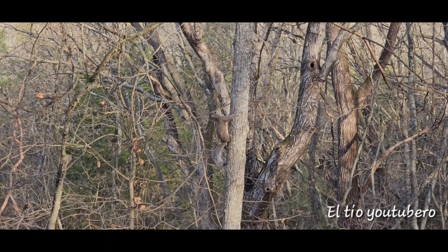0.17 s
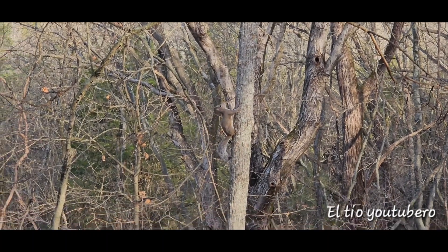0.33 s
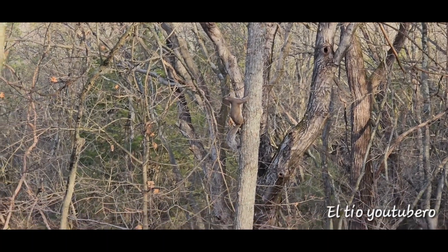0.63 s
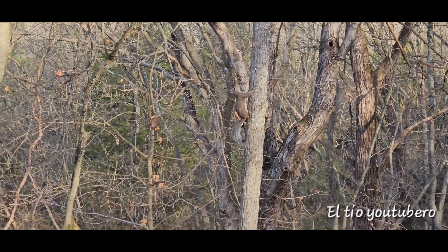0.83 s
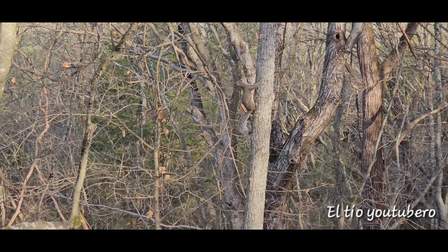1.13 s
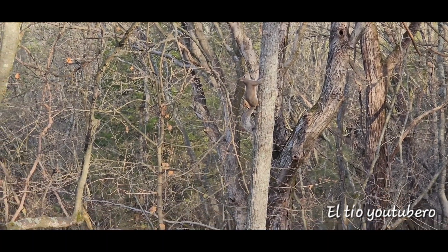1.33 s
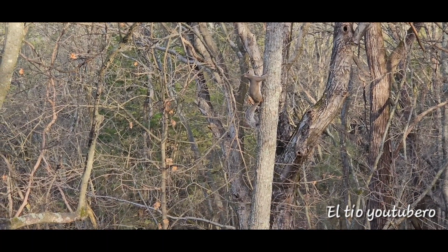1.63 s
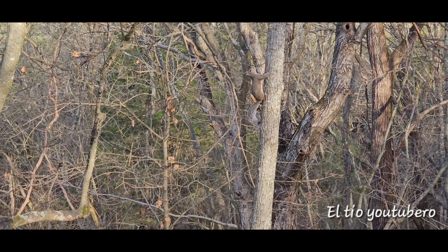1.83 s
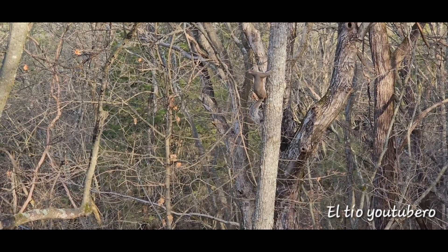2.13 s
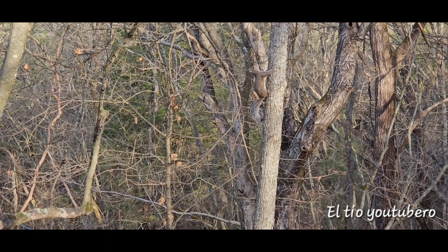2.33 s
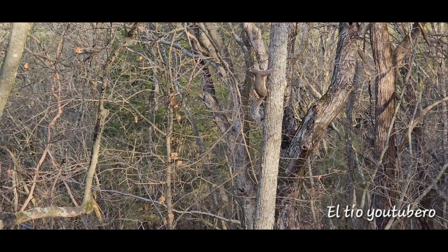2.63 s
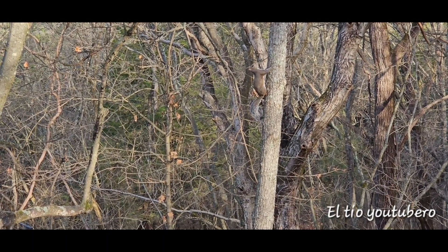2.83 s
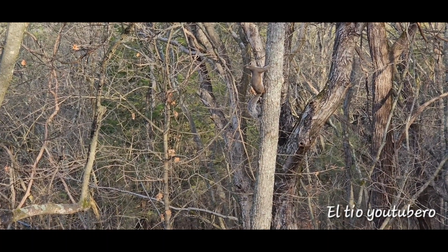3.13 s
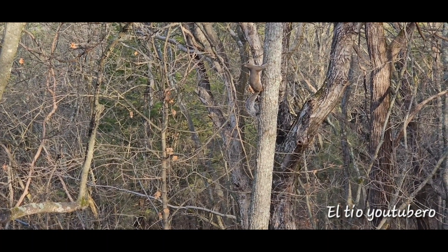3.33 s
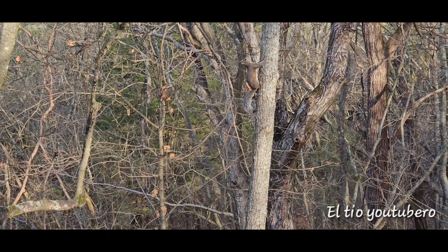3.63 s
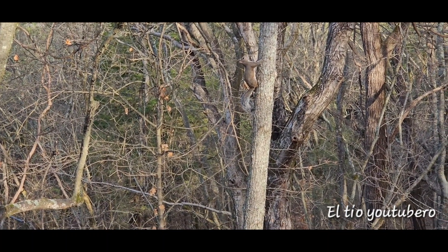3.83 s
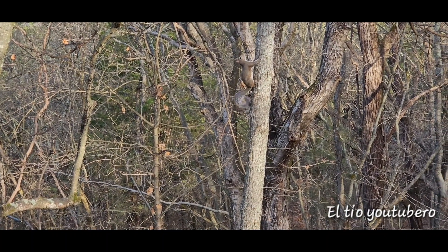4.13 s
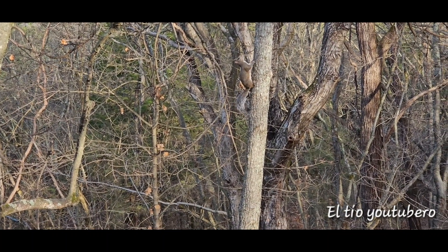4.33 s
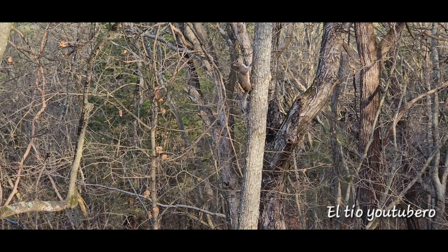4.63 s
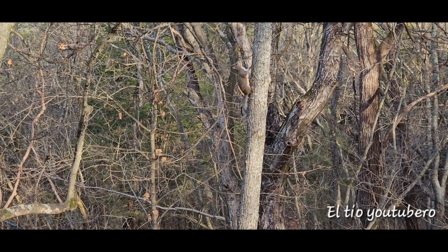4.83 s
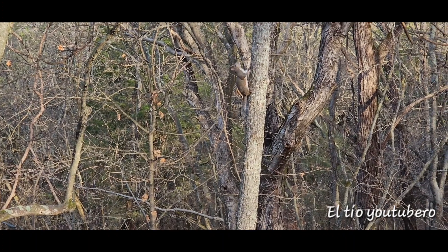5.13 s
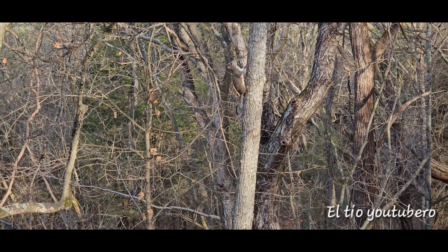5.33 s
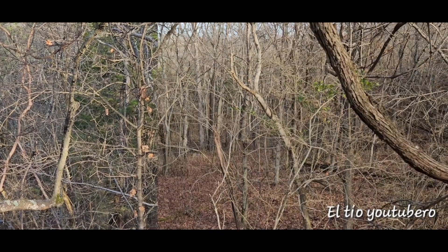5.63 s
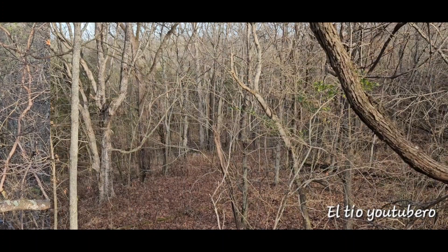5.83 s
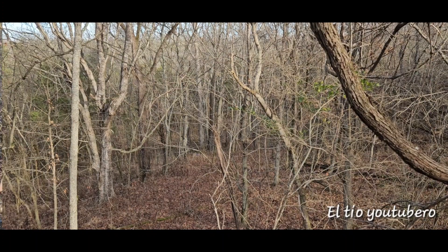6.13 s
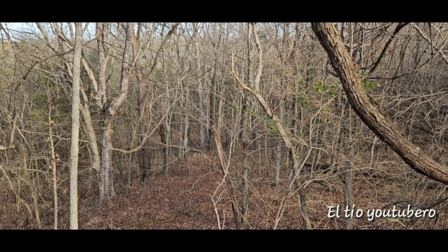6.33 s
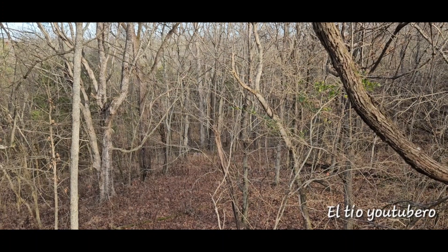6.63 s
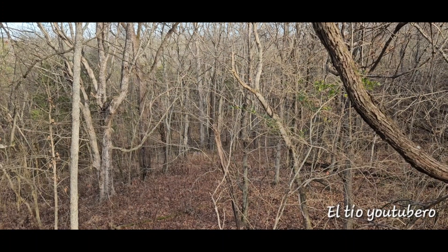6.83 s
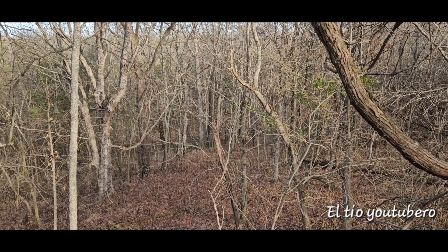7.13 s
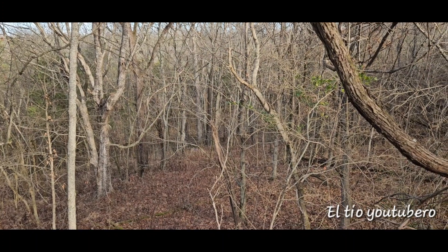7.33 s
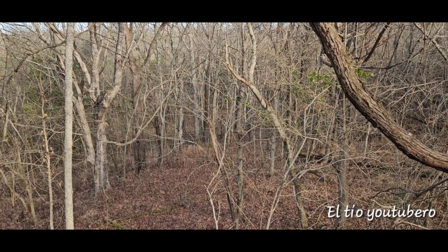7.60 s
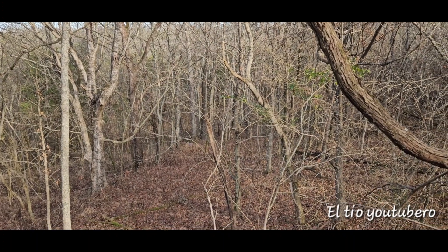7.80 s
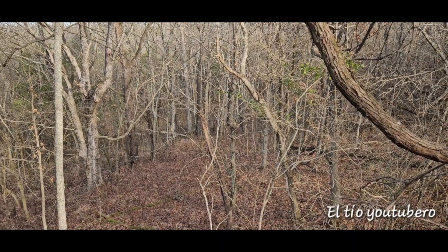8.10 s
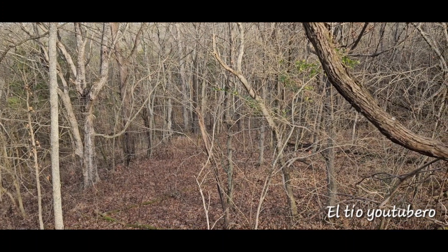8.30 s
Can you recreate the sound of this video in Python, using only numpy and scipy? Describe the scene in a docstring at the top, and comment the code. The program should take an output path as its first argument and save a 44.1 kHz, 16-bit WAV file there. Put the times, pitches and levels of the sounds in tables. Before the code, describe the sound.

Distant traffic rumbles and drones behind dry leaf crackles and thin bird calls, then cuts abruptly to quieter woods with a ringing, whistled birdsong.

```python
"""A wren-like song of gliding whistles echoes among bare winter trunks, the second of two spots heard in turn.
There, far rumble and air lie under it; a twig of ringing modes ticks and a far bird twitters.
The first spot, before a short break ending in a click, has distant traffic of noise and narrow drones,
hoarse scolds of noise and dry leaves stirred in resonant snaps. Small birds and a far whistler call
at both spots, as gliding near-sines; single leaf crunches, short noise bursts, also go on into the second."""
import sys
import numpy as np
from scipy import signal
from scipy.fft import rfft, irfft
from scipy.io import wavfile

SR = 44100
rng = np.random.default_rng(int(sys.argv[2]) if len(sys.argv) > 2 else 0)


def inscribe(sig):
    """Save sig as 16-bit PCM at rate SR to the path in sys.argv[1].

    A 1-D sig is mono; a 2-D sig holds one channel per row.
    Samples are clipped to [-1, 1] before scaling.
    """
    pcm = np.round(np.clip(np.atleast_2d(sig).T, -1, 1) * 32767)
    wavfile.write(sys.argv[1], SR, pcm.astype(np.int16))


N = 373086
TIME_S = np.arange(N) / SR
FREQS_HZ = np.maximum(np.arange(N // 2 + 1) * SR / N, 1)

FIRST_END_S, SECOND_START_S = 5.773, 5.815
BREAK_DB = -36   # what is left of the first spot during the break
CLICK_DB, CLICK_DECAY_S = -55.5, 0.0012
RIGHT_LAG_MS, CUTOFF_HZ = .2, 15500

# Stereo field of diffuse sound: (frequency [Hz], left-right likeness [0..1])
LIKENESS = [(25, .82), (60, .95), (130, .97), (300, .8), (600, .6), (1200, .25), (4000, .2), (12000, .2)]
# (frequency [Hz], left minus right [dB])
BALANCE = [(60, 0.5), (110, 0.1), (200, 0), (380, -2.5), (700, -1), (1290, -6), (2380, -5), (4400, -9.5),
           (8120, 3), (15000, -0.5)]

# Still air, first spot: (frequency [Hz], relative density [dB])
AIR_SPECTRUM = [(900, 6), (1400, -0.5), (2500, 0), (4400, 2), (5800, -11), (8300, -11.5), (10000, -29),
                (12000, -7), (15000, -16.5)]
AIR_DB = -76.5
# Steady hiss on the left, first spot: (centre [Hz], width [Hz], level [dB])
LEFT_HISS = [(2500, 620, -83.5), (3680, 520, -80)]

# Rumble and air, second spot: (frequency [Hz], relative density [dB])
FAR_RUMBLE_SPECTRUM = [(12, -58.5), (20, -32), (48, -5.5), (125, -2), (153, -8), (187, -8), (251, -10),
                       (291, -16), (390, -18), (533, -28.5), (584, -32), (688, -31), (783, -36.5),
                       (1600, -55.5), (2080, -93), (3520, -120)]
FAR_AIR_SPECTRUM = [(1200, -14), (1850, -5), (2150, 1.5), (2450, 4.5), (2900, -5), (3400, -8.5),
                    (4500, -11), (6500, -16.5), (10000, -32.5), (12000, -15), (15000, -26.5)]
FAR_RUMBLE_DB, FAR_AIR_DB = -47.5, -77.5
SETTLED_S, SETTLE_FADE_S, OPENING_RUMBLE_DB, OPENING_HISS_DB = 6.0, .03, -50.5, -74.5

# Traffic rumble and tyre noise: (frequency [Hz], relative density [dB])
RUMBLE_SPECTRUM = [(12, -47.5), (20, -13.5), (43, -13), (75, -3.5), (91, -1.5), (231, -9), (347, -25),
                   (420, -30), (550, -59.5), (920, -120)]
TYRE_SPECTRUM = [(190, -18.5), (330, -4.5), (425, -8), (517, -5), (595, -10.5), (729, -9.5), (859, -19.5),
                 (1290, -32.5), (1500, -43.5), (1950, -52.5), (3300, -120)]
# Slow swells of rumble and of tyre noise: (time [s], level [dB])
RUMBLE_FLOW = [(0, -39), (1.5, -38.5), (3.0, -39), (4.0, -37.5), (5.75, -39.5)]
TYRE_FLOW = [(0, -58), (1.2, -59), (2.3, -56.5), (3.3, -58.5), (4.3, -58), (5.75, -59)]
# Engine drone: (frequency [Hz], width [Hz], relative level [dB])
DRONE_LINES = [(87.2, 3.5, -2), (174.6, 5, -8.5), (229, 5.9, -18), (521, 8.4, -31.5), (725, 5.2, -37)]
# Load of the far engines: (time [s], drone gain [dB])
ENGINE_LOAD = [(0, -45), (1.2, -50), (2.9, -44), (4.0, -39.5), (4.7, -41), (5.7, -39.5)]

# Close rub: (frequency [Hz], relative density [dB])
BRUSH_SPECTRUM = [(5000, 4), (7000, -1.5), (9500, -26.5), (12000, 8.5), (15000, -8.5)]
# (time [s], hold [s], relative level [dB])
RUBS = [(.1, 0.25, -84.5), (.36, 0.23, -80), (.62, 0.027, -75.5), (1.0, .1, -82.5)]
RUB_ATTACK_S, RUB_RELEASE_S = .03, .1

# Dry leaves: (frequency [Hz], relative density [dB])
LEAF_SPECTRUM = [(800, -7), (1400, 0), (2200, 6.5), (3300, 2), (4500, 1), (5600, -5), (7000, -21.5),
                 (8800, -24), (10000, -37), (12000, -19), (15000, -24.5)]
# Bouts of stirring: (time [s], hold [s], relative level [dB])
STIRS = [(0.0, 0.44, -66), (.43, 0.19, -64.5), (.7, 0.37, -70.5), (1.02, 0.38, -69.5), (1.5, 0.16, -72.5),
         (1.78, 0.028, -74), (2.08, 0.044, -68.5), (2.26, .11, -76), (2.66, 0.51, -80.5),
         (3.68, 0.045, -68.5), (3.87, 0.11, -74.5), (4.36, 0.69, -76.5), (4.94, 0.32, -69.5),
         (5.33, .02, -75.5), (5.73, 0.044, -68)]
STIR_ATTACK_S, STIR_RELEASE_S, STIR_REST_DB = 0.017, .07, -82.5   # rest level relative, as in STIRS
# Single crunches: (time [s], relative level [dB], decay constant [s], resonance [Hz])
CRUNCHES = [(0.071, -55, 0.0046, 4000), (0.166, -56.5, 0.0078, 2400), (.197, -63.5, .008, 2200),
            (0.265, -59.5, 0.008, 3600), (0.312, -63, 0.0055, 2300), (.44, -64.5, 0.065, 2400),
            (0.574, -63.5, 0.0069, 2400), (1.052, -65, 0.01, 2600), (1.181, -62.5, 0.0067, 2600),
            (1.388, -63, .003, 5000), (1.429, -63.5, 0.011, 2400), (1.472, -62, 0.0044, 3190),
            (1.505, -65.5, 0.0085, 2500), (1.732, -65.5, .008, 3300), (1.791, -63, 0.0072, 2800),
            (2.062, -64.5, 0.005, 3990), (3.057, -64.5, 0.0074, 2400), (3.692, -66.5, .008, 2100),
            (3.718, -63, 0.009, 2100), (3.898, -58, 0.0055, 1800), (3.973, -65, 0.0062, 3490),
            (4.615, -67.5, .01, 3200), (4.96, -65, .005, 2800), (4.981, -63, 0.006, 2600),
            (5.12, -65, .008, 2300), (5.149, -61.5, .005, 2000), (5.174, -61.5, 0.006, 2300),
            (5.205, -63.5, .004, 2100), (5.237, -59, 0.006, 2300), (5.262, -64.5, .007, 2700),
            (5.348, -65, 0.0074, 2600), (5.527, -52.5, 0.003, 1600), (5.91, -67, .012, 1900),
            (7.026, -62, .004, 3490), (8.35, -72, 0.056, 2100)]
CRUNCH_RING = 2.2   # strength of each crunch's own resonance
CLUMPS_PER_S, CLUMP_DB = 60, 1.7   # snaps come in uneven clumps
# the leaf sound grows duller: treble gain at first and its loss
LEAF_TREBLE_HZ, LEAF_TREBLE_DB, LEAF_DULLING_DB_PER_S = 4700, 1, 2

# Twig snaps: (time [s], relative level [dB])
TICKS = [(6.4416, -38), (7.921, -59)]
# Twig modes: (frequency [Hz], relative level [dB], T60 [s])
TWIG_MODES = [(2650, -8, .005), (3300, -5.5, .005), (6500, -3.5, .0045), (7400, -1.5, .0045),
              (8900, -18, .008), (11900, -12, 0.0078)]
TWIG_LOW_HZ = 2000   # the snap is cut off below this

# Harsh scolding notes: (time [s], length [s], centre [Hz], relative level [dB])
SCOLDS = [(2.091, 0.044, 4210, -61.5), (2.152, 0.017, 3780, -64.5), (2.327, 0.06, 3780, -73),
          (4.35, 0.056, 3930, -63.5), (5.759, 0.036, 4200, -68)]
# Run of falling chips: (time [s], relative level [dB])
CHIPS = [(1.205, -65), (1.245, -67), (1.272, -64), (1.293, -62.5), (1.32, -60.5), (1.355, -71)]
CHIP = (0.032, 4500, 3950, 3250)   # (length [s], start [Hz], middle [Hz], end [Hz])

# Contours: (start, middle, end) as multiples of a note's nominal pitch
WHISTLE_CONTOUR, TWITTER_CONTOUR = (1.005, 0.96, 0.97), (0.89, 0.97, 0.98)
ARCH_CONTOUR, ARCH_LEAN_DB = (.87, 1, .87), -19.5
# Far whistler: (time [s], length [s], nominal pitch [Hz], relative level [dB])
WHISTLES = [(.77, 0.28, 3215, -73.5), (2.95, .1, 3130, -76), (3.16, 0.19, 3680, -73.5),
            (3.14, .17, 2760, -75), (3.58, 0.11, 3650, -75), (3.745, 0.097, 3590, -69),
            (4.015, .12, 3724, -70.5), (4.11, .08, 3600, -73), (4.03, 0.13, 2675, -81),
            (4.47, 0.2, 3700, -68.5), (4.66, 0.083, 3560, -71.5), (4.72, 0.06, 3130, -75),
            (4.98, .13, 3590, -69.5), (5.69, 0.03, 3550, -75), (5.715, .03, 3200, -74),
            (5.817, 0.06, 3130, -64), (5.835, 0.04, 2770, -71), (5.845, 0.08, 2560, -67),
            (5.92, 0.088, 2390, -72.5), (8.335, 0.05, 2380, -74.5)]
# Trembling twitters: (time [s], length [s], nominal pitch [Hz], relative level [dB])
TWITTERS = [(7.88, .05, 6890, -82), (7.985, 0.027, 6100, -76), (8.015, 0.027, 6700, -82),
            (8.025, 0.03, 7850, -85), (8.08, 0.028, 5980, -74.5), (8.17, .035, 5780, -75.5),
            (8.225, .02, 6300, -82), (8.262, 0.042, 5800, -75.5), (8.36, .03, 5900, -79)]
# Arched chirps: (time [s], length [s], nominal pitch [Hz], relative level [dB])
ARCHES = [(.015, 0.041, 7370, -58), (.102, 0.036, 7370, -61.5), (.185, 0.029, 7320, -64),
          (.268, .028, 7240, -64), (1.533, .03, 6270, -59), (1.612, .024, 5900, -66),
          (1.773, 0.012, 6950, -72), (1.821, 0.039, 7300, -66), (1.911, .031, 6250, -61.5),
          (2.004, 0.027, 5900, -69)]
# Down-slurs from one top pitch: (time [s], length [s], middle [Hz], end [Hz], relative level [dB])
SLURS = [(1.013, 0.016, 6500, 5040, -65.5), (1.181, 0.034, 6930, 6850, -75),
         (1.334, .038, 6750, 6600, -64.5), (1.454, .037, 6830, 5100, -68), (2.669, .026, 6120, 4700, -62.5),
         (4.331, 0.032, 6900, 6200, -69)]
SLUR_TOP_HZ, SLUR_LEAN_DB = 7900, -18
# Thin, nearly level notes: (time [s], length [s], start [Hz], end [Hz], relative level [dB])
THIN_NOTES = [(.585, 0.048, 6470, 6350, -77), (.885, .019, 6000, 5880, -74), (1.51, .05, 5300, 5050, -73),
              (1.7, .04, 5050, 4850, -76), (2.556, .085, 7620, 7430, -70), (2.764, .05, 4470, 4520, -60),
              (2.83, 0.041, 4500, 4480, -70), (2.93, .04, 4490, 4460, -75),
              (3.612, 0.07, 7900, 7450, -71.5), (3.71, .05, 7400, 7220, -68.5),
              (3.799, .06, 7360, 7240, -69), (3.9, .06, 7290, 7240, -75.5), (4.345, .062, 8150, 8140, -79),
              (4.904, 0.085, 8400, 8170, -79), (5.06, .12, 8480, 8380, -81.5)]
THIN_LEAN_DB = -11.5
# Peaked calls: (time [s], relative level [dB])
PEAKED_CALLS = [(6.262, -71), (7.498, -66.5)]
# Strokes of one peaked call:
# (time into call [s], length [s], start [Hz], middle [Hz], end [Hz], relative level [dB])
PEAKED_STROKES = [(0, .066, 7320, 7870, 8480, 2), (.066, .043, 8530, 8300, 7400, -2)]

# One song phrase, pitches before the round's factor:
# (time into phrase [s], length [s], start [Hz], middle [Hz], end [Hz], relative level [dB])
PHRASE = [(-.003, .014, 5900, 4960, 4600, -8), (.01, .03, 4560, 4280, 3990, -3.5),
          (0.051, .019, 3200, 4050, 4700, -0.5), (.068, .03, 4600, 4650, 4620, -11),
          (0.105, .036, 2830, 2952, 3060, 0), (.146, .032, 2650, 2330, 2050, -4.5),
          (.228, .04, 3810, 3590, 3494, -4), (.268, .062, 3470, 3440, 3420, -0.5),
          (.328, .042, 3030, 2855, 2580, 3.5), (.37, .06, 2573, 2557, 2545, -2.5)]
# Rounds of the phrase: (time [s], relative level [dB], pitch factor [ratio])
ROUNDS = [(6.47, -59, 1), (6.937, -55.5, 1), (7.405, -55.5, 1), (7.878, -55, .995)]
SONG_END_S = 8.08   # no song note starts from here on
SCATTER_HZ = 3850   # notes above this middle pitch are scattered more by twigs
SWELL = 1.05   # above 1, any note is loudest after its middle
# Upward flick from the singer's side: (time [s], length [s], start [Hz], middle [Hz], end [Hz])
FLICK = (7.238, .017, 4250, 5330, 5400)
FLICK_DB = -60.5


def from_db(db):
    """Decibels to gain."""
    return 10 ** (np.asarray(db) / 20)


def rms_one(x):
    """Scale to unit power."""
    return x / np.sqrt(np.mean(x ** 2) + 1e-20)


def level_curve(rows):
    """Gain over time from (time [s], level [dB])."""
    time_s, level_db = np.transpose(rows)
    return from_db(np.interp(TIME_S, time_s, level_db))


def over_hz(points):
    """Table read along the log-frequency axis."""
    hz, value = np.transpose(points)
    return np.interp(np.log(FREQS_HZ), np.log(hz), value)


def add(out, start_s, sound):
    """Mix a sound in at a time."""
    at = max(round(start_s * SR), 0)
    out[..., at:at + sound.shape[-1]] += sound[..., :max(N - at, 0)]


def panned(lean_db):
    """Left and right gains, left minus right in dB, with mean 1."""
    gains = from_db([[lean_db / 2], [-lean_db / 2]])
    return gains / gains.mean()


def white():
    """Two unrelated noises."""
    return rng.standard_normal((2, N))


def shape(points):
    """Gain per frequency, falling steeply outside the table."""
    below = np.minimum(FREQS_HZ / points[0][0], 1)
    above = np.minimum(points[-1][0] / FREQS_HZ, 1)
    return from_db(over_hz(points)) * (below * above) ** 4


def hump(hz, width_hz):
    """Resonance gain, halved at width_hz to either side."""
    return 1 / (1 + ((FREQS_HZ - hz) / width_hz) ** 2)


def diffuse(pair, gain):
    """Colour two signals and spread them: alike in the bass, apart in the treble; the middle has rms 1."""
    mid, side = rfft(pair) * gain
    alike = np.clip(over_hz(LIKENESS), 0, .995)
    mid = mid * np.sqrt(1 + alike)
    side = side * np.sqrt(1 - alike)
    lean = from_db(over_hz(BALANCE) / 2)
    out = irfft(np.array([(mid + side) * lean, (mid - side) / lean]), N)
    return out / out.mean(0).std()


def trunks(x, wet_db, t60_s, near_db=-6, near_s=0.013, build_s=0.0024):
    """Direct sound, smeared by nearby twigs, then many small trunk echoes, different in each ear."""
    t = TIME_S[:SR * 3 // 2]
    scatter = rng.standard_normal((2, 2, len(t)))
    near = scatter[0] * np.exp(-t / near_s)
    far = scatter[1] * from_db(-60 * t / t60_s) * (1 - np.exp(-t / build_s))
    near /= np.linalg.norm(near, axis=1, keepdims=True)
    far /= np.linalg.norm(far, axis=1, keepdims=True)
    echoes = from_db(near_db) * near + from_db(wet_db) * far
    return x + signal.fftconvolve(x, echoes, axes=1)[:, :N]


def rebounds(x, first_db, latest_s, count=6):
    """A few thick trunks each send back a distinct echo, weaker the later it comes."""
    out = x.copy()
    for ear in (0, 1):
        for share in rng.uniform(.2, 1, count):
            add(out[ear], share * latest_s, from_db(first_db) * .2 / share * x[ear])
    return out


def bouts(rows, attack_s, release_s):
    """Gain of overlapping gestures that each rise, hold and die away; powers add."""
    power = np.zeros(N)
    for start_s, hold_s, db in rows:
        rise = np.clip((TIME_S - start_s) / attack_s, 0, 1)
        fall = np.exp(-np.maximum(TIME_S - start_s - hold_s, 0) / release_s)
        power += (from_db(db) * rise * fall) ** 2
    return np.sqrt(power)


def note(length_s, start_hz, middle_hz, end_hz, waver=.006, flutter_db=0):
    """Near-sine whistle gliding through three pitches, unsteady in pitch and strength."""
    u = np.linspace(0, 1, round(length_s * SR))
    bend, tremble = (np.interp(u, np.linspace(0, 1, 16), rng.standard_normal(16)) for _ in range(2))
    glide_hz = np.polyval(np.polyfit([0, .5, 1], [start_hz, middle_hz, end_hz], 2), u)
    phase = 2 * np.pi * np.cumsum(glide_hz * (1 + waver * bend)) / SR
    envelope = np.abs(np.sin(np.pi * u ** SWELL)) ** 0.56
    return np.sin(phase) * envelope * from_db(flutter_db * tremble)


def notes(rows, waver=.006, flutter_db=0):
    """Play (time [s], length [s], start [Hz], middle [Hz], end [Hz], level [dB])."""
    out = np.zeros(N)
    for start_s, length_s, start_hz, middle_hz, end_hz, db in rows:
        add(out, start_s, from_db(db) * note(length_s, start_hz, middle_hz, end_hz, waver, flutter_db))
    return out


def contoured(rows, contour):
    """Give notes of one kind their shared contour, each at its own pitch."""
    return [(s, length_s, *(hz * np.array(contour)), db) for s, length_s, hz, db in rows]


def repeated(starts, pattern):
    """Lay out a pattern of notes at every (time [s], level [dB])."""
    return [(s + offset_s, *glide, db + note_db)
            for s, db in starts for offset_s, *glide, note_db in pattern]


def still_air():
    """Faint broadband hiss at the first spot, plus narrow noise bands on the left."""
    left = np.zeros(N)
    for hz, width_hz, db in LEFT_HISS:
        band = irfft(rfft(white()[0]) * hump(hz, width_hz) ** 2, N)
        left += from_db(db) * rms_one(band)
    return from_db(AIR_DB) * diffuse(white(), shape(AIR_SPECTRUM)) + left * [[1], [0]]


def quiet_woods():
    """Far rumble and still air at the second spot; for a moment the sound is thinner and hissier."""
    settled = np.clip((TIME_S - SETTLED_S) / SETTLE_FADE_S, 0, 1)
    rumble_db = OPENING_RUMBLE_DB + settled * (FAR_RUMBLE_DB - OPENING_RUMBLE_DB)
    rumble = from_db(rumble_db) * diffuse(white(), shape(FAR_RUMBLE_SPECTRUM))
    hiss = from_db(OPENING_HISS_DB) * (1 - settled) * diffuse(white(), shape(AIR_SPECTRUM))
    air = from_db(FAR_AIR_DB) * diffuse(white(), shape(FAR_AIR_SPECTRUM))
    return rumble + hiss + air


def traffic():
    """Far engines drone in narrow noise lines over swelling rumble and tyre noise."""
    drone = sum(from_db(db) * diffuse(white(), hump(hz, width_hz)) for hz, width_hz, db in DRONE_LINES)
    rumble = level_curve(RUMBLE_FLOW) * diffuse(white(), shape(RUMBLE_SPECTRUM))
    tyres = level_curve(TYRE_FLOW) * diffuse(white(), shape(TYRE_SPECTRUM))
    return rumble + tyres + level_curve(ENGINE_LOAD) * drone


def brushing():
    """Faint bright rub of dry stuff close by: shaped noise under slow gestures."""
    rub = bouts(RUBS, RUB_ATTACK_S, RUB_RELEASE_S) * diffuse(white(), shape(BRUSH_SPECTRUM))
    return rub * panned(lean_db=-9.0)


def leaf_grains(per_s, spread_db, sharpness, patchy_db=3.0, patches_per_s=22, count=18):
    """Tiny snaps of uneven size, each ringing briefly at the pitch of its own leaf; the leaves take turns."""
    sizes = from_db(spread_db * np.minimum(rng.exponential(1, (2, N)), 4))
    snaps = white() * sizes * (rng.random((2, N)) < per_s / SR)
    leaf = rng.integers(0, count, N)
    turns = from_db(patchy_db * np.clip(rng.standard_normal((count, 1000)), -2, 2))
    snaps = snaps * turns[leaf, (TIME_S * patches_per_s).astype(int)]
    out = np.zeros((2, N))
    for k, hz in enumerate(np.geomspace(1200, 13000, count)):
        ring = signal.iirpeak(hz, sharpness, fs=SR)
        out += signal.lfilter(*ring, snaps * (leaf == k) + 1e-18)
    return out


def crunches():
    """Each crunch of a leaf is a short noise burst, coloured by a resonance of its own."""
    out, t = np.zeros((2, N)), TIME_S[:SR // 4]
    for start_s, db, decay_s, hz in CRUNCHES:
        burst = rng.standard_normal((2, len(t)))
        ring = signal.lfilter(*signal.iirpeak(hz, 2, fs=SR), burst)
        burst = rms_one(burst + CRUNCH_RING * ring)
        add(out, start_s, from_db(db) * burst * np.exp(-t / decay_s))
    return out.std() * diffuse(out, shape(LEAF_SPECTRUM))   # recoloured, then rescaled


def leaves(stir_db=-6.0):
    """Dry leaves crackle in clumps as an animal stirs; single crunches, short noise bursts, are added on top."""
    grains = leaf_grains(per_s=1900, spread_db=3.0, sharpness=9.0)
    clump_db = CLUMP_DB * np.interp(TIME_S * CLUMPS_PER_S, np.arange(N), rng.standard_normal(N))
    activity = from_db(STIR_REST_DB) + bouts(STIRS, STIR_ATTACK_S, STIR_RELEASE_S)
    activity = activity * from_db(clump_db) * (TIME_S < FIRST_END_S)
    out = from_db(stir_db) * activity * diffuse(grains, shape(LEAF_SPECTRUM)) + crunches()
    lowpass = signal.butter(4, LEAF_TREBLE_HZ, fs=SR, output="sos")
    body = signal.sosfiltfilt(lowpass, out)
    treble = (out - body) * from_db(LEAF_TREBLE_DB - LEAF_DULLING_DB_PER_S * TIME_S)
    return trunks((body + treble) * panned(lean_db=-7.5), wet_db=-6.5, t60_s=0.18, near_db=-12.5)


def twig():
    """A dry snap close by: decaying modes ring for a few milliseconds."""
    t, out = TIME_S[:SR // 20], np.zeros(N)
    snap = sum(from_db(db - 60 * t / t60_s) * np.sin(2 * np.pi * hz * t) for hz, db, t60_s in TWIG_MODES)
    snap = signal.sosfilt(signal.butter(3, TWIG_LOW_HZ, "high", fs=SR, output="sos"), snap)
    for start_s, db in TICKS:
        add(out, start_s, from_db(db) * snap)
    return trunks(out * panned(lean_db=-16.0), wet_db=-25, t60_s=0.17, near_db=-12, near_s=0.005)


def scolds(width_hz=850):
    """Hoarse notes: bursts of noise in one broad resonance with steep skirts."""
    out = np.zeros((2, N))
    for start_s, length_s, hz, db in SCOLDS:
        swell = np.sqrt(np.abs(np.sin(np.pi * np.clip((TIME_S - start_s) / length_s, 0, 1))))
        out += from_db(db) * swell * diffuse(white(), hump(hz, 2 * width_hz) ** 3)
    return trunks(out * panned(lean_db=-6.5), wet_db=-11.5, t60_s=0.5, near_db=-7.0)


def chips():
    """A hurried run of falling chips that blur together in the echoes."""
    out = np.zeros(N)
    for start_s, db in CHIPS:
        add(out, start_s, from_db(db) * note(*CHIP, waver=0.022))
    return trunks(out * panned(lean_db=-18.5), wet_db=1.5, t60_s=0.57, near_db=-5)


def far_whistler():
    """Soft, wavering, broken whistles, mostly echo."""
    out = notes(contoured(WHISTLES, WHISTLE_CONTOUR), waver=.014, flutter_db=2.5)
    return trunks(out * panned(lean_db=-13.5) * from_db(-3), wet_db=3.5, t60_s=0.86, near_db=1.0)


def twitter():
    """A far bird's grainy flutter of short unsteady notes, blurred by the trunks."""
    out = notes(contoured(TWITTERS, TWITTER_CONTOUR), waver=.016, flutter_db=4.0)
    return trunks(out * panned(lean_db=-11) * from_db(-2.5), wet_db=2.5, t60_s=0.55, near_db=1.0)


def small_birds():
    """Thin high calls from the branches nearby: arches, down-slurs, level notes and, closer, peaked calls."""
    arches = notes(contoured(ARCHES, ARCH_CONTOUR), waver=.007, flutter_db=1.5)
    slur_rows = [(s, length_s, SLUR_TOP_HZ, middle, end, db) for s, length_s, middle, end, db in SLURS]
    slurs = notes(slur_rows, waver=.014, flutter_db=3.0)
    chirps = panned(ARCH_LEAN_DB) * arches + panned(SLUR_LEAN_DB) * slurs
    thin_rows = [(s, length_s, start, (start + end) / 2, end, db)
                 for s, length_s, start, end, db in THIN_NOTES]
    thin = panned(THIN_LEAN_DB) * notes(thin_rows, waver=.005, flutter_db=2.0)
    peaked = panned(lean_db=2.0) * notes(repeated(PEAKED_CALLS, PEAKED_STROKES))
    return (trunks(chirps, wet_db=-6.0, t60_s=0.52, near_db=-8.0)
            + trunks(thin, wet_db=-3.5, t60_s=0.75, near_db=-7.0)
            + trunks(peaked, wet_db=-10.5, t60_s=0.45, near_db=-4.0))


def song():
    """One rolling phrase repeated at a steady pace, never quite alike; high notes are scattered more."""
    sung = [(s + offset_s, length_s, *(pitch * np.array(glide)), db + note_db)
            for s, db, pitch in ROUNDS
            for offset_s, length_s, *glide, note_db in PHRASE if s + offset_s < SONG_END_S]
    low_rows = [row for row in sung if row[3] < SCATTER_HZ]
    high_rows = [row for row in sung if row[3] >= SCATTER_HZ]
    side = panned(lean_db=-12.5)
    low = notes(low_rows, waver=0.0069, flutter_db=2.5) * side * from_db(2.0)
    high = notes(high_rows, waver=0.02, flutter_db=3.0) * side * from_db(-2.5)
    flick = notes([(*FLICK, FLICK_DB)]) * side
    low = rebounds(low, first_db=-8, latest_s=.22)
    return (trunks(low, wet_db=-5.5, t60_s=0.92, near_db=-8, near_s=0.016, build_s=0.012)
            + trunks(high, wet_db=3.0, t60_s=1.0, near_db=0.5, near_s=0.006, build_s=0.012)
            + trunks(flick, wet_db=3.0, t60_s=0.53, near_db=-0.5, near_s=0.009))


def break_click():
    """Noise that swells and dies within milliseconds, peaking where the second spot starts."""
    envelope = np.exp(-np.abs(TIME_S - SECOND_START_S) / CLICK_DECAY_S)
    return from_db(CLICK_DB) * envelope * diffuse(white(), shape(AIR_SPECTRUM))


def scene():
    """The first spot, a short break ending in a click, then the second."""
    first = still_air() + traffic() + brushing() + scolds() + chips()
    second = quiet_woods() + twig() + twitter() + song()
    wildlife = leaves() + far_whistler() + small_birds()
    before = np.clip((FIRST_END_S - TIME_S) / .003, 0, 1)
    after = np.clip((TIME_S - SECOND_START_S) / .001, 0, 1)
    first_gain = np.maximum(before, from_db(BREAK_DB) * (1 - after))
    return first_gain * (first + wildlife) + break_click() + after * (second + wildlife)


def record(dry):
    """Sound reaches the right port a little later; the top is cut steeply."""
    right = np.pad(dry[1], (round(RIGHT_LAG_MS * SR / 1000), 0))[:N]
    lowpass = signal.ellip(10, .2, 80, CUTOFF_HZ, fs=SR, output="sos")
    return signal.sosfilt(lowpass, [dry[0], right])


dry = scene()
out = record(dry)
inscribe(out)
```